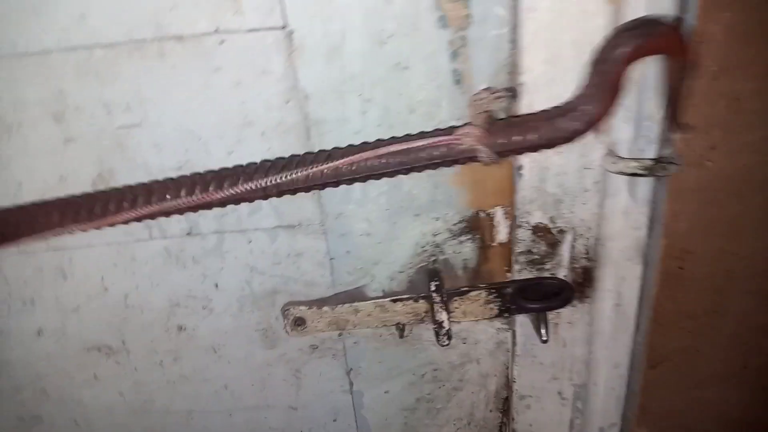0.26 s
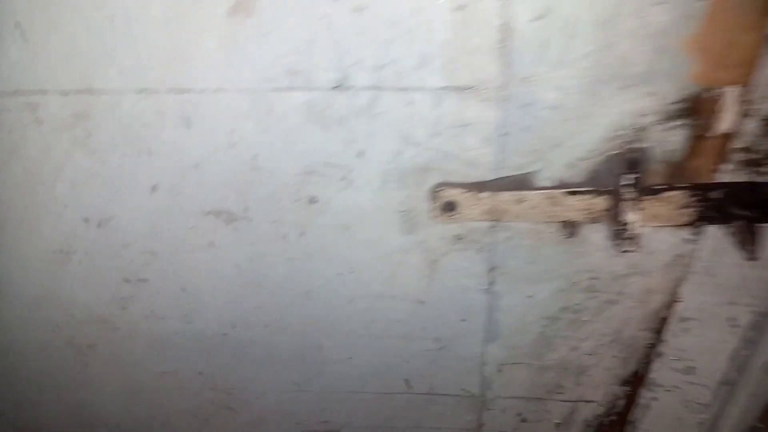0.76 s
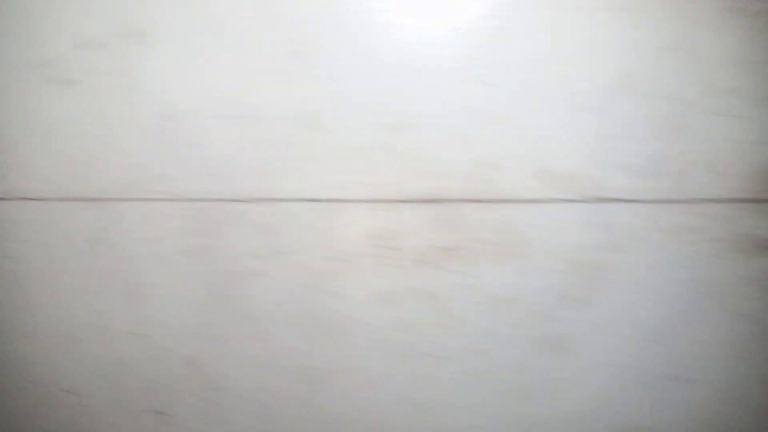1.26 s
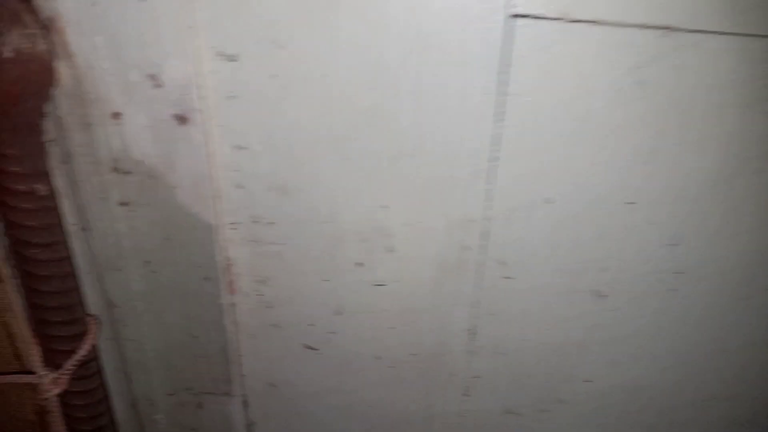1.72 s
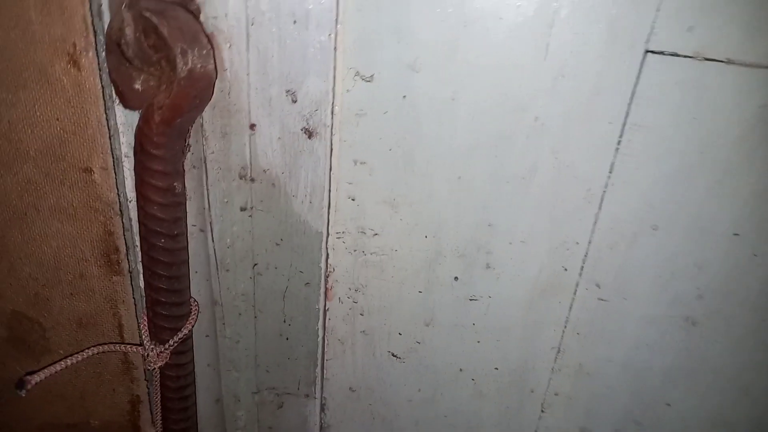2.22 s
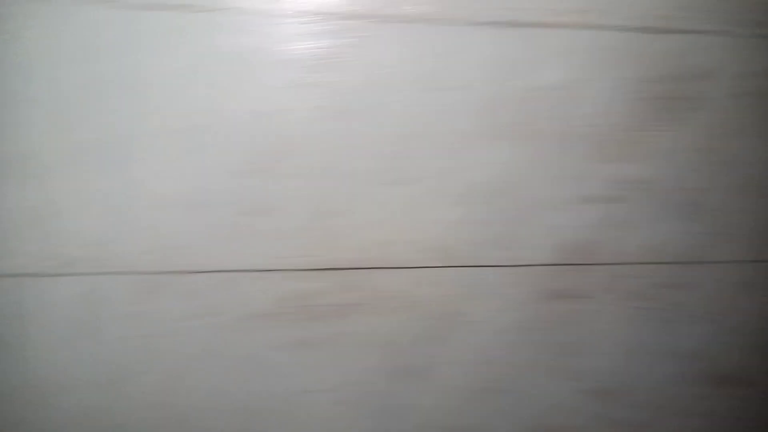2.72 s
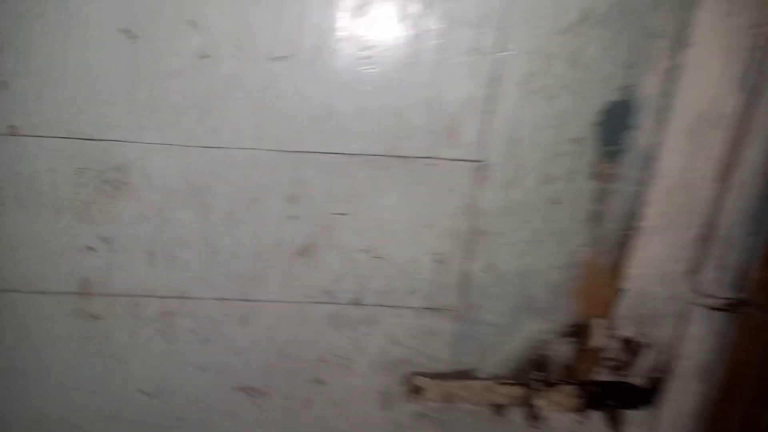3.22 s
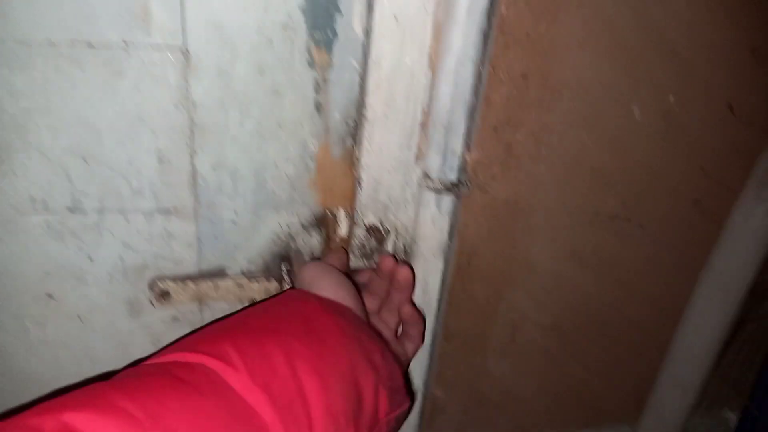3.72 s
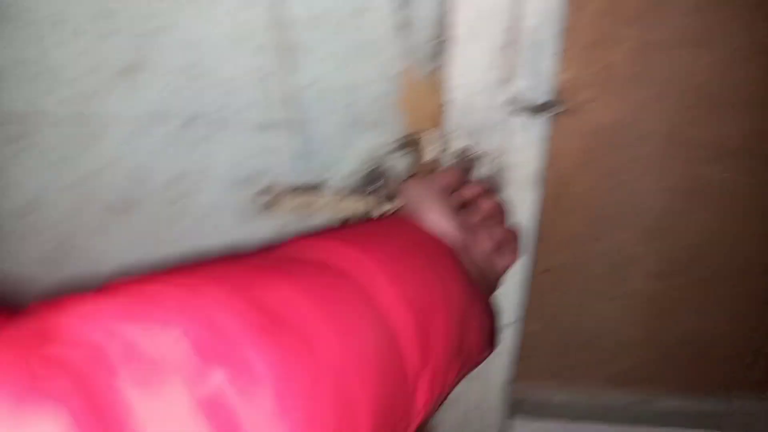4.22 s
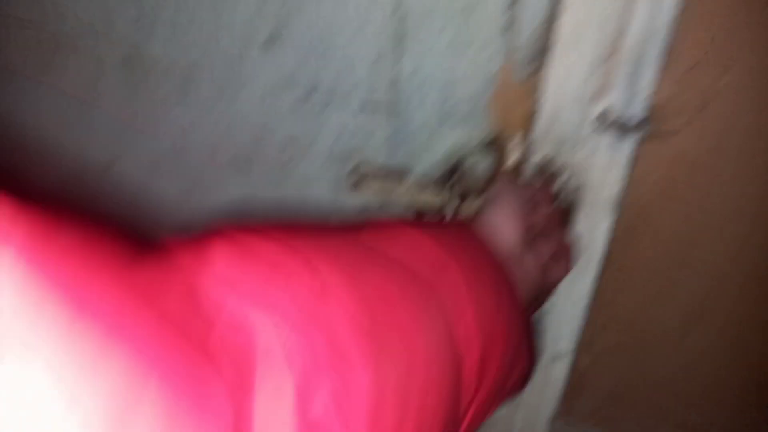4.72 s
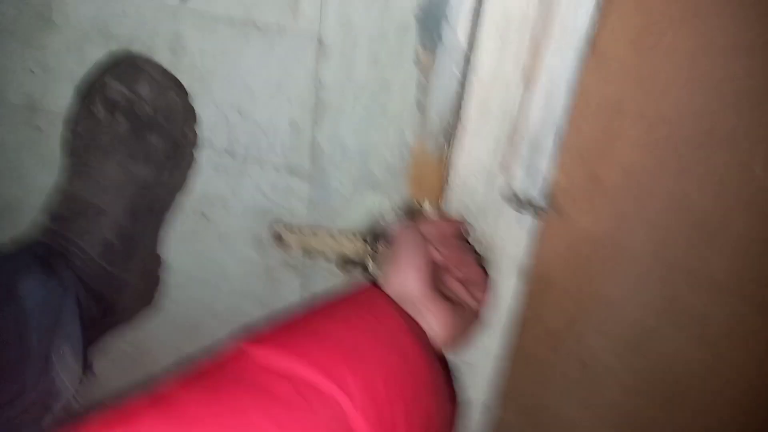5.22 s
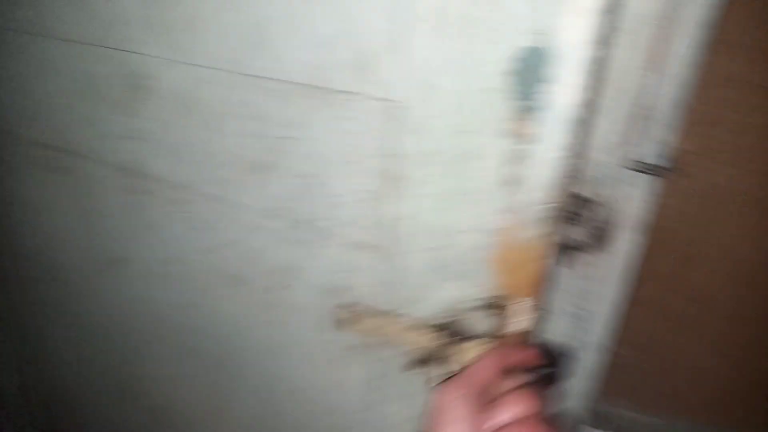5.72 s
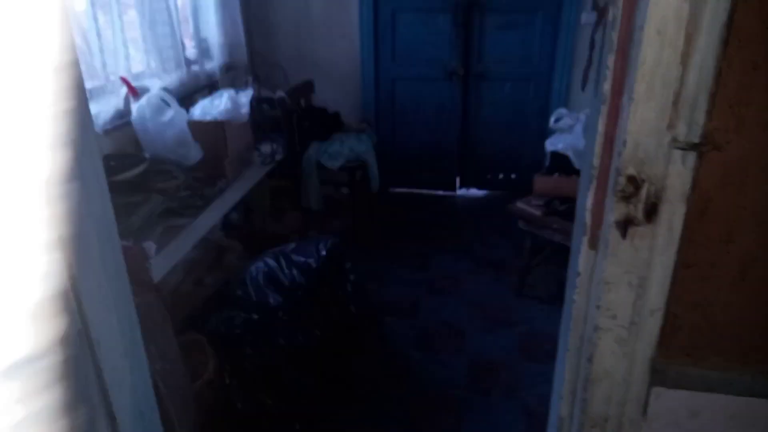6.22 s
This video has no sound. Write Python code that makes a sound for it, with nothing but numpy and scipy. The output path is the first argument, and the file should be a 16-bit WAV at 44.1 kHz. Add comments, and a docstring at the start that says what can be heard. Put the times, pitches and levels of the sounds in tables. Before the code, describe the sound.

Close handheld stereo pickup, slightly dull, in a boarded porch with about half a second of reverberation. Opening thuds and a small hook clink give way to uneven footfalls and woody rattles, a short wavering hum, and a sharp knock with metallic clang. Jacket fabric swishes in two strong bursts. Then a single overwhelming kick slams the wooden door, followed by a lighter thud, tinny latch clinks and a faint hollow board.

```python
"""Boots thud on the boards of a small wooden porch and a kick frees its door: pushed modes and noise tails.
A steel bar is unhooked, leant on the wall, where it hums as a wavering tone, and later clangs.
A nylon jacket rustles as swells of bright noise; soles rub the boards, murmuring in their low modes.
Hook, bar, latch and a hollow board ring as beating pairs of modes. Noise reflections form the room."""
import sys
import numpy as np
from scipy import signal
from scipy.io import wavfile

SR = 44100
rng = np.random.default_rng(int(sys.argv[2]) if len(sys.argv) > 2 else 0)


def waveform_to_disk(signal):
    """Save audio, clipped to [-1, 1], as 16-bit WAV at the path in sys.argv[1]."""
    frames = np.transpose(np.atleast_2d(signal))
    scaled = np.clip(frames, -1, 1) * 32767
    samples = np.round(scaled).astype(np.int16)
    wavfile.write(sys.argv[1], SR, samples)


N = 284886


def from_db(db):
    """Gain of a level in dB."""
    return 10 ** (np.asarray(db) / 20)


def rms_one(x):
    """Scale to rms 1."""
    return x / np.sqrt(np.mean(x ** 2) + 1e-20)


def at_hz(points, hz):
    """Read a spectrum on a log-frequency axis."""
    point_hz, values = np.array(points)[:, 0], np.array(points)[:, 1]
    return np.interp(np.log(hz), np.log(point_hz), values)


def band(x, low_hz, high_hz):
    """Butterworth band-pass."""
    edges = [low_hz, min(high_hz, .45 * SR)]
    return signal.sosfilt(signal.butter(2, edges, "band", fs=SR, output="sos"), x)


def drift(rate_hz):
    """Slow chance of spread 1: noise through a two-pole low-pass, drawn at every 40th sample."""
    pole = np.exp(-2 * np.pi * rate_hz * 40 / SR)
    white = rng.standard_normal(N // 40 + 2002)
    slow = signal.lfilter([1], [1, -2 * pole, pole * pole], white)[2000:]   # settled part only
    return np.interp(np.arange(N) / 40, np.arange(len(slow)), rms_one(slow))


def swell(full_s, db, rise, hold_s, fall):
    """Gain that climbs, holds and sinks again, at steady dB per second."""
    late = np.arange(N) / SR - full_s
    slopes_db = np.minimum(rise * late, fall * (hold_s - late))
    return from_db(np.clip(slopes_db, -150, 0) + db)


def ring(clicks, hz, t60):
    """A damped resonator: a unit click sets a sine of height 1 ringing."""
    radius, angle = from_db(-60 / (t60 * SR)), 2 * np.pi * hz / SR
    feedback = [1, -2 * radius * np.cos(angle), radius * radius]
    return signal.lfilter([0, np.sin(angle)], feedback, clicks + 1e-18)


def pushed(rows, modes, spread_octaves, build_cycles):
    """Each blow pushes the modes near its own pitch; they build up over a few cycles."""
    starts_s, levels_db, pitches_hz = np.array(rows)[:, :3].T
    at = np.round(starts_s * SR).astype(int)
    scatter_db = rng.normal(0, 3, (len(rows), len(modes)))
    out = np.zeros(N)
    for k, (hz, mode_db, t60) in enumerate(modes):
        near = np.exp(-.5 * (np.log2(hz / pitches_hz) / spread_octaves) ** 2)
        push = np.zeros(N)
        push[at] = (-1) ** k * near * from_db(levels_db + mode_db + scatter_db[:, k])
        drive = ring(push, hz, build_cycles / hz) * hz / SR * 15 / build_cycles
        out += ring(drive, hz, t60)
    return out


def struck(hits, modes):
    """Each hit sets every mode ringing; rust and loose fit split each mode into a beating pair."""
    starts_s, hit_db = np.array(hits).T
    at = np.round(starts_s * SR).astype(int)
    out = np.zeros(N)
    for hz, mode_db, t60 in modes:
        for side in (-1, 1):
            clicks = np.zeros(N)
            clicks[at] = from_db(hit_db + mode_db - 4 + rng.normal(0, 3, len(at)))
            out += ring(clicks, hz + side * rng.uniform(3, 9), t60)
    return out


EDGES_HZ = 40 * 2 ** np.arange(0, 9.1, .5)   # half-octave band edges
# likeness of left and right: (f/Hz, correlation)
STEREO_LIKENESS = [(60, 0.98), (200, 0.86), (400, 1), (800, -0.12), (1500, 0.17), (4000, -0.049),
                   (14000, -0.36)]


def stereo_bands(size, gain_of_band):
    """Half-octave bands of stereo noise, each with its own gain and likeness."""
    out, white = 0, rng.standard_normal((2, 2, size))
    for k, (low, high) in enumerate(zip(EDGES_HZ, EDGES_HZ[1:])):
        mid, side = band(white[k % 2], low, high)   # neighbouring bands use different noise
        hz = np.sqrt(low * high)
        alike = np.clip(at_hz(STEREO_LIKENESS, hz), -1, 1)
        stereo = np.sqrt(1 + alike) * mid + np.sqrt(1 - alike) * side * [[1], [-1]]
        out = out + gain_of_band(hz) * stereo
    return out


# decay time of the porch: (f/Hz, t60/s)
ROOM_DECAY = [(60, 0.43), (250, 0.62), (1000, 0.56), (3000, 0.54), (6000, 0.51), (14000, 0.21)]
DIRECT_DB = -13.5


def porch(x):
    """Dense reflections die band by band, each band passing unit energy, behind a direct click."""
    t = np.arange(SR) / SR

    def decay(hz):
        t60 = at_hz(ROOM_DECAY, hz)
        return from_db(-60 * t / t60) * np.sqrt(np.log(1e3) / t60 / SR)
    tail = stereo_bands(SR, decay)
    tail[:, 0] += from_db(DIRECT_DB)
    return signal.fftconvolve(x[None], tail, axes=1)[:, :N]


RUMBLE_DB = -69


def rumble():
    """A faint rumble from outside: low band-passed noise."""
    return from_db(RUMBLE_DB) * rms_one(band(rng.standard_normal(N), 50, 380))


# soles rubbing on the boards: (peak t/s, level/dB, rise and fall/dB per s)
SOLE_RUBS = [(.0, -23, 270), (.25, -30, 115), (.86, -54.5, 100), (1.29, -44.5, 97), (1.782, -49, 131),
             (2.909, -54.5, 25), (3.34, -45, 110), (3.6, -65, 92), (4.34, -65, 34), (5.0, -53, 50),
             (5.42, -44, 120), (5.78, -44, 111), (5.92, -61.5, 181), (6.25, -68, 150), (6.42, -73, 57)]
# low modes of air and boards: (f/Hz, level/dB, t60/s)
AIR_AND_BOARDS = [(57.4, -1, 0.43), (71, -7, 0.2), (81.9, -2.5, 0.45), (103.3, -2, 0.84), (130.2, -1, 0.32),
                  (157.8, 0, 0.21), (187.4, -10, 0.67), (209.7, -1.5, 0.099)]
# modes of the wooden panels: (f/Hz, level/dB, t60/s)
PANEL_MODES = [(263.5, 2, 0.42), (305.8, -6, 0.39), (344.4, -2, 0.17), (371, -3.5, 0.3), (433, 2, 0.034),
               (443.7, -5.5, 0.23), (493.5, -5, 0.26), (549, -7.5, 0.15), (579, -8.5, 0.35),
               (604, -10, 0.18), (679, -12, 0.19), (746, -5, 0.2), (807, -10.5, 0.68), (862.7, -1.5, 0.36),
               (1004, 0.5, 0.18), (1098, -13, 0.55), (1165, -6, 0.28), (1470, 6.5, 0.2)]


def shuffle():
    """Soles rubbing keep the low modes murmuring, 3 dB weaker per octave upwards."""
    rub = rng.standard_normal(N) * from_db(3 * drift(12))
    murmur = np.zeros(N)
    for hz, _, _ in AIR_AND_BOARDS[1:] + PANEL_MODES[:5]:
        murmur += ring(rub, hz, 0.18) * from_db(-3.0 * np.log2(hz / 100))
    strokes = sum(swell(s, db, slope, 0, slope) for s, db, slope in SOLE_RUBS)
    return strokes * rms_one(murmur)


# blows on boards and door: (t/s, thud level/dB, thud centre f/Hz, settling weight level/dB,
# panel knock level/dB, tail level/dB near 500 Hz, tail tilt/dB per octave, woody body/dB, contact/s)
WOOD_BLOWS = [(.033, -22.5, 91, -24.5, -42.5, -34, 2.3, -4.5, 0.0059),
              (.151, -26, 88, -20, -27.5, -43, 4, 11.5, 0.0024),
              (.65, -44.5, 126, -48, -51.5, -49.5, -10, -15, 0.0078),
              (.72, -35.5, 130, -51, -60, -63, -2, -15, 0.0045),
              (.872, -37, 120, -57, -53, -46.5, -12, -20, 0.014),
              (.932, -33, 140, -34, -35.5, -36, -13, -20, 0.01),
              (.953, -27, 132, -41, -36, -39.5, -7.5, 11.5, 0.0021),
              (1.227, -31.5, 134, -32.5, -35, -39.5, -3, -4.5, 0.0052),
              (1.313, -43.5, 124, -50.5, -53, -65.5, 6.5, 4.5, 0.0024),
              (1.51, -34, 187, -22, -86, -35.5, -3, 15, 0.012),
              (1.526, -27, 162, -29.5, -30.5, -32, -1.5, 0, 0.0021),
              (1.55, -26, 188, -34, -27, -35, -14, 8, 0.0066),
              (2.4, -54, 100, -47.5, -58, -77, 9, 0, 0.026),
              (2.51, -31.5, 115, -31, -45, -37, -10.5, 19, 0.003),
              (2.81, -42.5, 145, -38, -54.5, -39.5, -6, -6, 0.011),
              (3.126, -26.5, 97, -28.5, -17.5, -32, 0.8, 13.5, 0.0021),
              (3.469, -34, 107, -43.5, -55, -39.5, -7, -4, 0.013),
              (3.748, -87, 90, -70.5, -75.5, -53, 4, -13.5, 0.0067),
              (4.164, -36.5, 136, -46, -38, -46.5, -6.5, 15.5, 0.042),
              (4.499, -31.5, 93, -30, -37, -47, -8, 7, 0.0088),
              (5.197, -7.5, 89, -10, -16.5, -14, -0.13, -9, 0.0029),
              (5.205, -17, 155, -26, -48, -50.5, 1.5, .1, 0.00435),
              (5.216, -12.5, 57.7, -9, -37, -49.5, 9, -23, 0.00093),
              (5.723, -29, 118, -32, -36, -35, -0.1, -6, 0.0057),
              (5.906, -46, 111, -52, -60, -45.5, 3.5, -7, 0.0055),
              (5.926, -62, 110, -65, -47.5, -49.5, 1.8, 2.3, 0.00088),
              (6.218, -55, 79, -48.5, -80, -85, 2, -3, 0.023),
              (6.287, -48, 95, -43, -51, -42.5, 2, -9.5, 0.0052)]
# colour shared by all tails: (f/Hz, level/dB, share of the woody body)
TAIL_COLOUR = [(484, 0.5, 0), (2000, 0.07, 0.97), (5440, -7, 0.27), (12000, -26, 0)]
HARD_S = .002   # a hard contact
CRACK_DB, CRACK_LOSS_DB = 11, 4   # crack above the tail at a hard contact; loss per doubling of contact
CRACK_S, BASS_NOISE_DB = 0.0022, -7.5   # life of the first crack; noise relative to the thud


def blow_tails(hz):
    """Level in one band of all blows: a short crack, then the dense ring of wood and walls dying away."""
    power, t = np.zeros(N), np.arange(SR) / SR
    width = np.sqrt(hz * 0.25 / SR)   # bands carry power in step with their width
    ringing = from_db(-120 * t / at_hz(ROOM_DECAY, hz))   # decay of power
    tail_hz = TAIL_COLOUR[0][0]
    for s, thud_db, thud_hz, _, _, tail_db, tilt_db, body_db, contact in WOOD_BLOWS:
        spectrum = [(thud_hz, thud_db + BASS_NOISE_DB)]
        for point_hz, db, share in TAIL_COLOUR:
            tilted_db = tilt_db * np.log2(point_hz / tail_hz)
            spectrum.append((point_hz, tail_db + db + share * body_db + tilted_db))
        level_db = at_hz(spectrum, hz)
        crack_db = CRACK_DB - CRACK_LOSS_DB * np.log2(contact / HARD_S)
        crack = (from_db(2 * max(crack_db, 0)) - 1) * np.exp(-t / CRACK_S) * np.minimum(t * hz, 1)
        rise = (1 - np.exp(-t / max(contact, .0005))) ** 2
        at = round(s * SR)
        power[at:at + SR] += (from_db(2 * level_db) * (rise * ringing + crack))[:N - at]
    return np.sqrt(power) / width / 4 * min(hz / 70, 1) ** 2


# weight settles twice after a blow: (delay t/s, level/dB)
WEIGHT_SETTLES = [(.043, 2.4), (.105, -7)]
# panels rattling on their own: (t/s, level/dB, centre f/Hz)
PANEL_RATTLES = [(1.52, -37, 770), (1.54, -30, 1130), (1.584, -36, 300), (1.89, -45, 263),
                 (2.19, -60.5, 294), (2.99, -53, 447), (3.17, -27.5, 350), (3.36, -34, 340),
                 (3.42, -38, 333), (4.23, -41.5, 360)]
KNOCK_HZ, KNOCK_SAG = 507, 0.26   # panel pitch of a hard contact; octaves lost per doubling of contact
THUD_SPREAD = 0.53   # octaves of modes excited


def blows():
    """Thudding and knocking modes below, dense decaying noise above; softer contacts knock lower."""
    knocked, settled = [], []
    for s, _, thud_hz, settle_db, knock_db, *_, contact in WOOD_BLOWS:
        knocked.append((s, knock_db, KNOCK_HZ * (contact / HARD_S) ** -KNOCK_SAG))
        for later, change_db in WEIGHT_SETTLES:
            settled.append((s + later, settle_db + change_db, thud_hz))
    knocks = pushed(knocked + PANEL_RATTLES, PANEL_MODES, spread_octaves=0.49, build_cycles=3.3)
    thuds = pushed(WOOD_BLOWS, AIR_AND_BOARDS, THUD_SPREAD, build_cycles=20.0)
    thuds += pushed(settled, AIR_AND_BOARDS, spread_octaves=0.39, build_cycles=5.4)
    return thuds + knocks + from_db(-5) * porch(knocks) + stereo_bands(N, blow_tails)


# the hook leaves its eye: (t/s, level/dB)
HOOK_CLINKS = [(.036, -57), (.151, -45)]
# modes of the hook: (f/Hz, level/dB, t60/s)
HOOK_MODES = [(1236, 12.5, 0.18), (1590, 0, 0.2), (1710, -1, 0.11), (2110, 0, 0.08), (2570, -1, 0.27),
              (2780, 7.5, 0.21), (4040, 15.5, 0.048), (4170, 12.5, 0.079), (4280, -8, 0.28)]


def hook():
    """The hook clinks out of its eye, ringing in its metal modes."""
    return struck(HOOK_CLINKS, HOOK_MODES)


# strokes of the jacket: (full at t/s, treble level/dB, rise/dB per s, hold/s, fall/dB per s,
# loss/dB per octave below 4 kHz)
JACKET_STROKES = [(.05, -56.5, 98, 0.011, 300, -7), (.1, -73, 300, .01, 28, 0),
                  (0.522, -67, 55, .005, 76, -0.5), (0.712, -60.5, 2498, 0.19, 98, 4),
                  (0.941, -56, 198, 0.098, 92, -1), (1.156, -61.5, 100, 0.13, 24.5, 2),
                  (2.145, -68.5, 701, .005, 30, 1.5), (2.662, -60.5, 54, .005, 45, -0.5),
                  (3.016, -54, 100, 0.14, 102, 24), (3.21, -55.5, 68, .15, 113.5, -6),
                  (3.448, -37, 41, 0.014, 130.5, -0.5), (3.768, -67, 50, 0.0059, 56, -1),
                  (4.243, -58, 42, 0.066, 60, 0.6), (4.42, -47.5, 450, 0.056, 200, 2),
                  (4.509, -38, 800, 0.061, 108, 1.5), (4.604, -37.5, 102, .005, 94.5, -1.24),
                  (4.989, -54.5, 51, 0.15, 42, -1.5), (5.748, -49.5, 1009, 0.03, 107, 0.5),
                  (5.812, -53.5, 145, 0.0067, 118, 11), (5.903, -75, 101.5, .005, 68, -8),
                  (6.204, -64.5, 72, 0.0043, 40.5, 5)]
# colour of the cloth: (f/Hz, level/dB)
CLOTH_COLOUR = [(60, -14), (150, -3.5), (350, 12), (700, 10), (1500, 11.5), (3000, 13), (4500, 14),
                (6000, 16), (9000, 12), (13000, 22), (16000, -7)]


def rustle(patchy_db):
    """Cloth sliding on cloth: smooth bright noise that flickers a little in every band."""
    powers = np.array([swell(*stroke[:5])[::64] ** 2 for stroke in JACKET_STROKES])   # every 64th sample
    loss_db = np.array(JACKET_STROKES)[:, 5]
    together = drift(26)

    def gain(hz):
        octaves_below = np.clip(np.log2(4000 / hz), 0, 3)
        colours = from_db(-2 * loss_db * octaves_below)   # power of each stroke in this band
        level = np.repeat(np.sqrt(colours @ powers), 64)[:N]
        flicker_db = patchy_db * (together + drift(3.1))
        return level * from_db(at_hz(CLOTH_COLOUR, hz) + flicker_db)
    return stereo_bands(N, gain)


# swells of the hum: (multiple of the pitch, level/dB, rise/dB per s, fall/dB per s)
HUM_SWELLS = [(1, -30, 139, 117), (1, -50, 64, 4.5), (2, -37.5, 170, 204)]
HUM_HZ, HUM_PEAK_S, HUM_END_S = 177, 1.853, 2.7   # the leaning bar hums against the wall panel


def hum():
    """A tone with its octave, swelling and wavering as the bar settles on the panel."""
    t = np.arange(N) / SR
    phase = 2 * np.pi * np.cumsum(HUM_HZ + 1.6 * drift(26)) / SR
    tone = np.zeros(N)
    for multiple, db, rise, fall in HUM_SWELLS:
        tone += swell(HUM_PEAK_S, db, rise, 0.0098, fall) * np.sin(multiple * phase)
    fade = np.clip((HUM_END_S - t) / 0.017, 0, 1)
    return fade * from_db(1.37 * drift(34)) * np.sqrt(2) * tone


# steel bar struck: (t/s, level/dB)
BAR_CLANGS = [(3.127, -27.5), (3.15, -25.5), (3.232, -57)]
# modes of the bar: (f/Hz, level/dB, t60/s)
BAR_MODES = [(748, -10, .3), (1281, -6, .3), (1947, -8, .15), (2090, -2, .04), (2223, -4, .07),
             (2484, -5, .4), (3208, -9, .4), (4140, -10, .35), (4899, -7, .45), (5507, -3, .3),
             (5846, -4, .3), (6352, -7, .2), (6800, -4, .1)]


def bar():
    """The struck steel bar clangs in its own modes."""
    return struck(BAR_CLANGS, BAR_MODES)


# the latch snaps against its staple: (t/s, level/dB)
STAPLE_SNAPS = [(5.218, -16.5), (5.2195, -26.5), (5.222, -22), (5.225, -47)]
# modes of the staple: (f/Hz, level/dB, t60/s)
STAPLE_MODES = [(2900, -6, .006), (5650, -6, .03), (5850, -3, .03), (8600, 8, .003), (11000, 12, .0025),
                (13600, 15, .0025)]
SNAP_DB, SNAP_ROOM_DB = 4, 0   # close by: direct and reflected gain


def snap():
    """The latch snaps against its staple in very short bright modes, heard direct and reflected."""
    click = struck(STAPLE_SNAPS, STAPLE_MODES)
    return from_db(SNAP_DB) * click + from_db(SNAP_ROOM_DB) * porch(click)


# loose latch clinks: (t/s, level/dB)
LATCH_CLINKS = [(5.904, -40.5), (5.913, -44), (5.922, -37.5), (5.931, -47.5)]
# modes of the latch: (f/Hz, level/dB, t60/s)
LATCH_MODES = [(966, -5, 0.092), (1670, -16, 0.082), (2300, -8.5, 0.063), (3120, -15, 0.098),
               (3260, -7, 0.11), (4130, -9, 0.037), (5400, -5, .07), (6220, -2.5, 0.033), (9921, -5, .06),
               (10880, -4, .12), (11040, 12, 0.14), (12100, 6, 0.034)]


def latch():
    """The loose latch clinks in its metal modes."""
    return struck(LATCH_CLINKS, LATCH_MODES)


# the door meets a hollow board: (t/s, level/dB)
BOARD_HITS = [(6.291, -45.5), (6.335, -46)]
# modes of the hollow board: (f/Hz, level/dB, t60/s)
BOARD_MODES = [(568, -13, 0.24), (584, 3.5, 0.3), (612, -11.5, 0.16), (954, -5, 0.2), (994, -2.5, 0.24),
               (1050, -15, 0.34)]


def door_stop():
    """The door sets a hollow board ringing in two clusters of close modes."""
    return struck(BOARD_HITS, BOARD_MODES)


# the microphones swing about: (t/s, left minus right level/dB)
MIC_SWING = [(0.05, -2.0), (3.94, -2), (4.07, -0.5), (5.07, -2.5), (5.23, -1), (6.46, -2)]
RIGHT_LAG = 13   # samples
METAL_ROOM_DB = 3.5   # reflected gain of the ringing parts


def scene():
    """All the sources in the porch over a faint rumble from outside."""
    ringing = hook() + bar() + latch() + door_stop()
    struck_sounds = blows() + ringing + from_db(METAL_ROOM_DB) * porch(ringing) + snap()
    left, right = struck_sounds + hum() + rustle(patchy_db=0.5) + shuffle() + rumble()
    right = np.concatenate([np.zeros(RIGHT_LAG), right[:-RIGHT_LAG]])   # the door is nearer the left port
    swing_s, swing_db = np.transpose(MIC_SWING)
    pan_db = np.interp(np.arange(N) / SR, swing_s, swing_db)
    return np.array([left * from_db(pan_db / 2), right * from_db(-pan_db / 2)])


START_S, CUTOFF_HZ = .032, 16250   # silent until the start; top cut


def record(dry):
    """The small microphones drop steeply above their port resonance; peaks are rounded, the top is cut."""
    low = signal.sosfilt(signal.cheby1(6, 1.5, 6600, fs=SR, output="sos"), dry)
    top = signal.sosfilt(signal.butter(4, 8200, "high", fs=SR, output="sos"), dry)
    both = low + from_db(-17.5) * top
    heard = signal.sosfilt(signal.butter(5, 42, "high", fs=SR, output="sos"), both)
    started = np.arange(N) / SR > START_S
    rounded = 0.93 * np.tanh(heard / 0.82) * started
    return signal.sosfilt(signal.cheby2(14, 70, CUTOFF_HZ, fs=SR, output="sos"), rounded)


dry = scene()
out = record(dry)
waveform_to_disk(out)
```